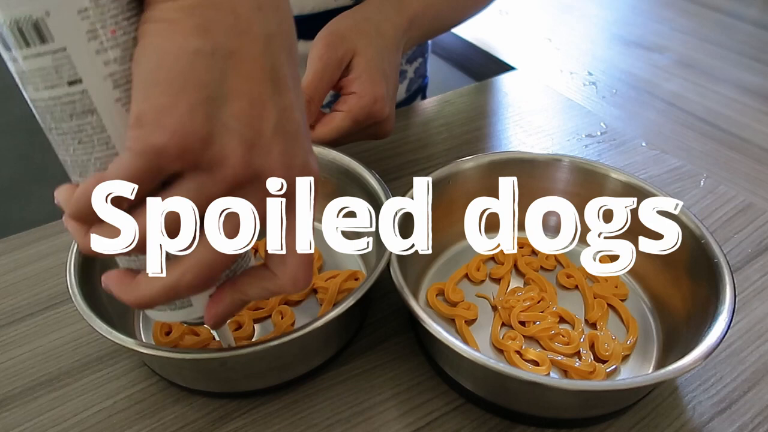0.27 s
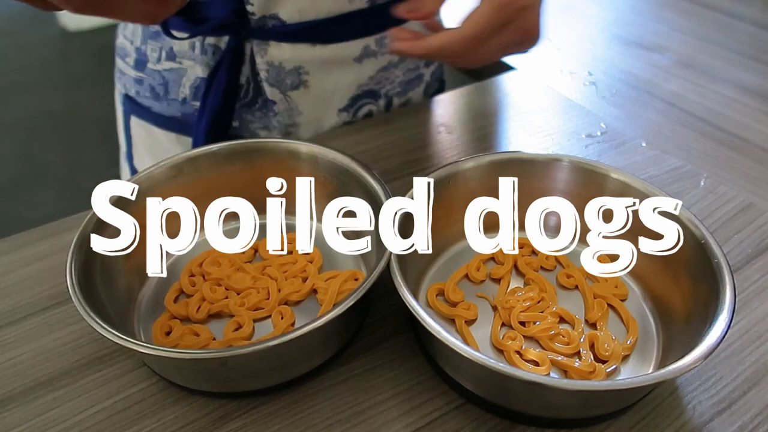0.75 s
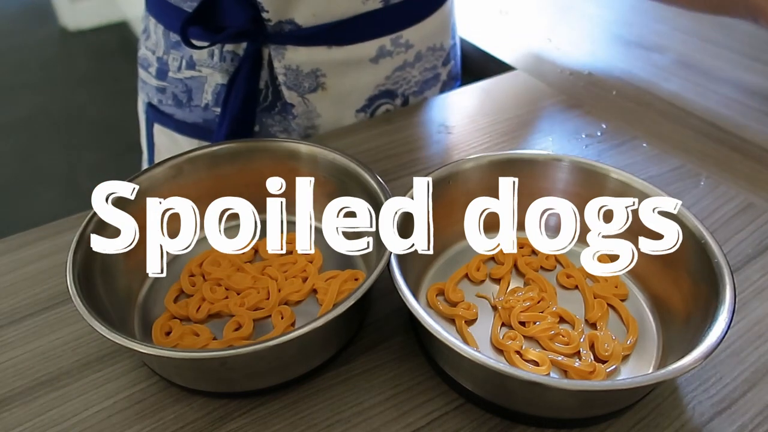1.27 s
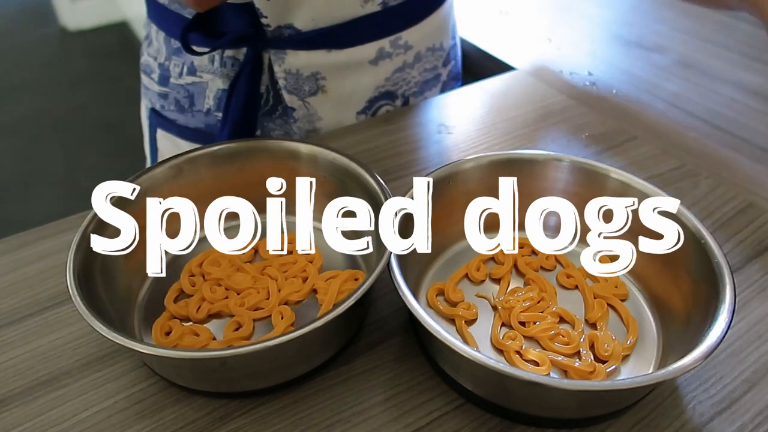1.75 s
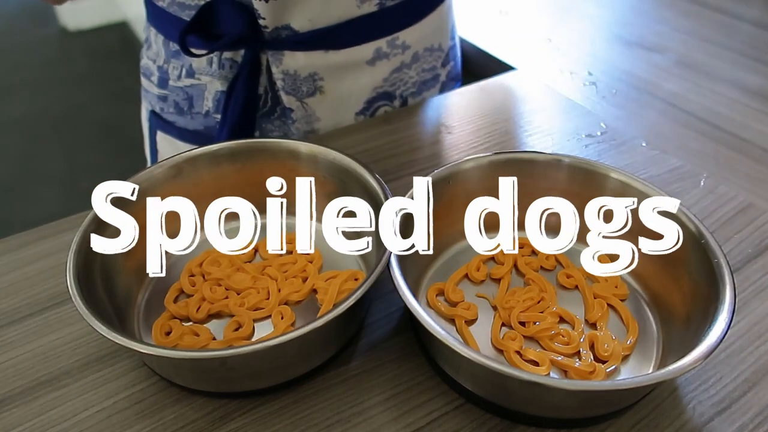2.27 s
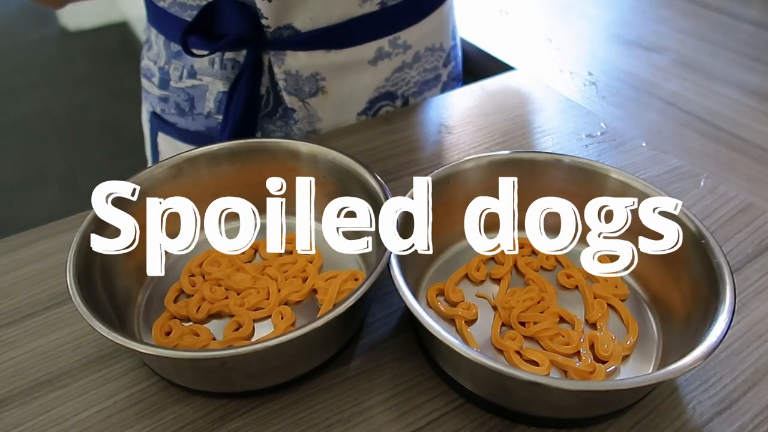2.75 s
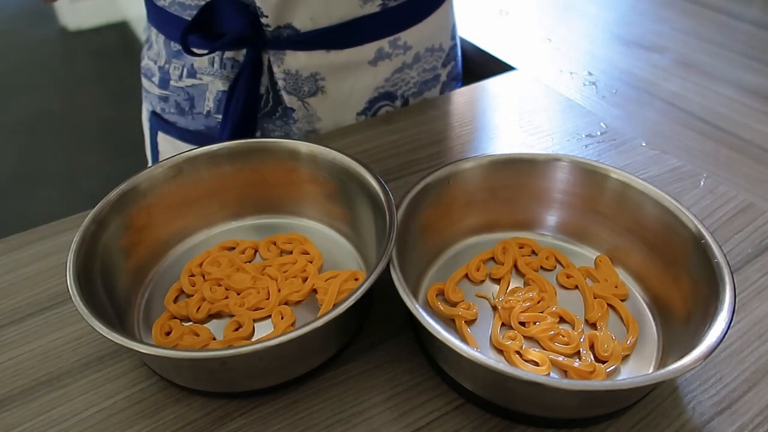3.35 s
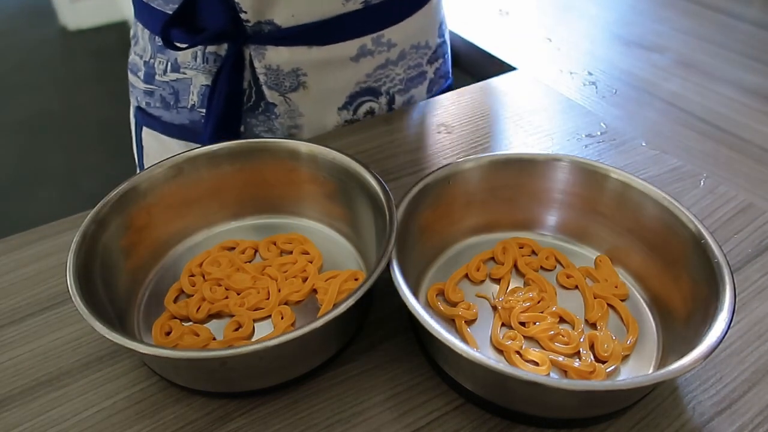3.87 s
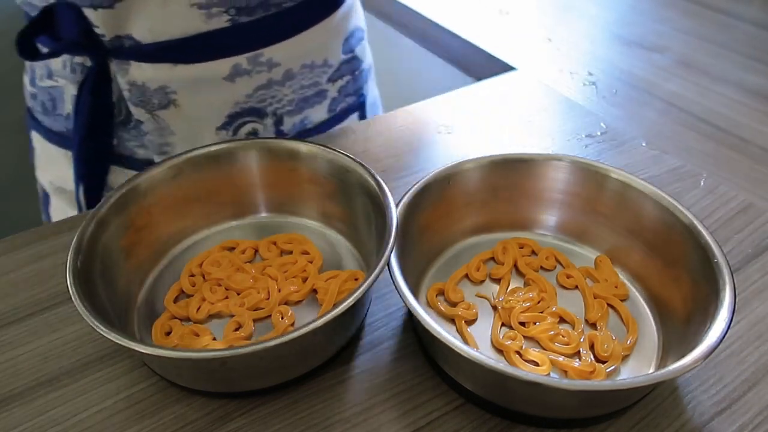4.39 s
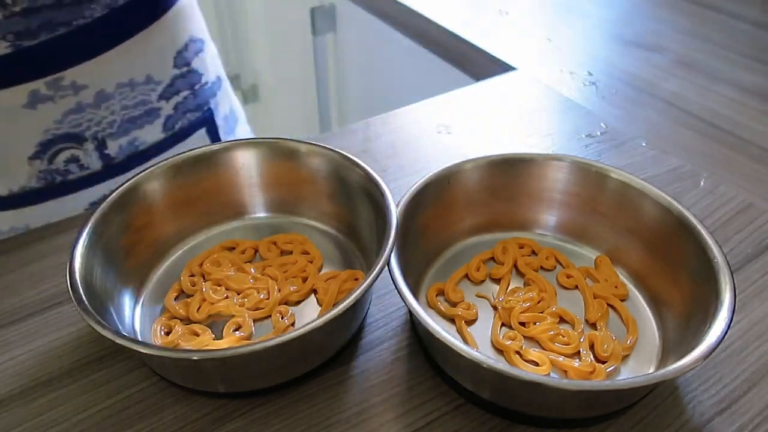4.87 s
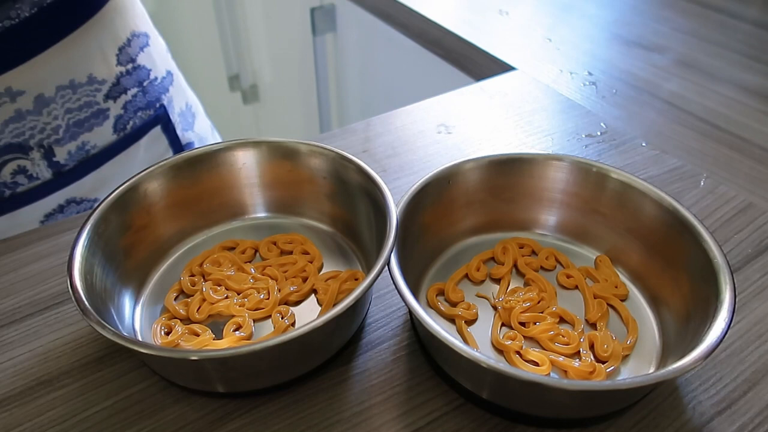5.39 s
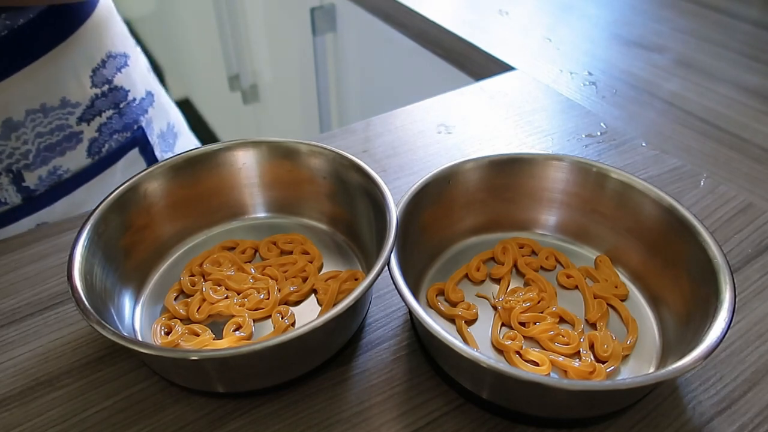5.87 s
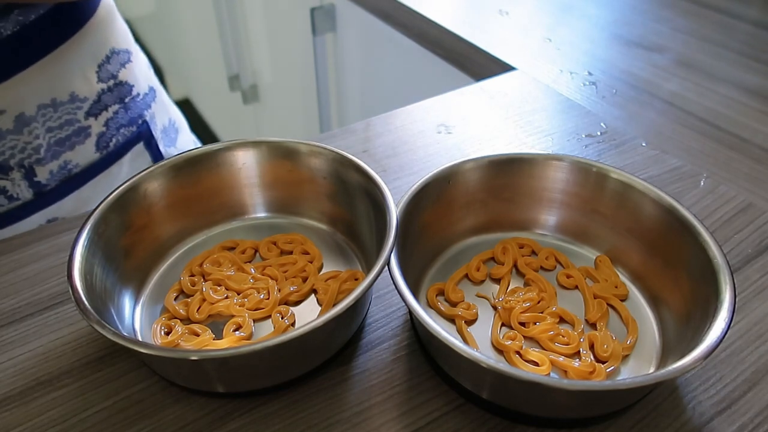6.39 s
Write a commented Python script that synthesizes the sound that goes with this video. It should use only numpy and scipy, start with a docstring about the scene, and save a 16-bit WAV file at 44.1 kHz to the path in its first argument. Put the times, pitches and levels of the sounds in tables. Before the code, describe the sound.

A small stereo microphone sits close to a kitchen counter, with low appliance rumble, mains hum and a faint, rapid focus-motor tick coming and going. A light knock at 0.06 s precedes a quick, short-ringing cluster of steel bowl taps around 0.3 s and a fainter touch at 0.55. Fingers slide softly from about 1 s; the tub knocks at 1.33-1.39 and is set down with a hard clack at 1.73. Its lid rattles at 2.77-2.9, twists with a sharp crack near 2.94 and a lighter click at 3.17, then snaps at 3.31 and very loudly at 3.36. The background dips briefly afterwards. Soft cloth rustles come around 3.9-4.4, tiny knocks at 4.96. A cupboard door bangs loudly at 5.32 with room echo; bowls buzz faintly at 5.42-5.6. Quiet woody knocks follow at 6.15-6.23 and 6.47.

```python
"""On a kitchen countertop, an emptied food tub is handled beside two steel bowls: a bowl is tapped, the tub is
set down, its lid rattles, twists and snaps shut; later a cupboard door bangs and the bowls buzz.
Struck things are short bursts of force sent through decaying tones, then a wash of room reflections.
Sliding fingers, soft noisy swells, room air, mains hum and a ticking focus motor lie below.
Everything reaches a small microphone pair whose gain ducks after the loudest blows."""
import sys
import numpy as np
from scipy import signal
from scipy.io import wavfile
from scipy.ndimage import minimum_filter1d, map_coordinates

SR = 44100
rng = np.random.default_rng(int(sys.argv[2]) if len(sys.argv) > 2 else 0)


def int16_out(signal):
    """Quantize to a 16-bit WAV file."""
    q = np.round(np.clip(np.atleast_2d(signal).T, -1, 1) * 32767)
    wavfile.write(sys.argv[1], SR, q.astype(np.int16))


N = 292345   # length in samples

# Room air and appliance rumble, tone colour. Columns: pitch_hz, level_db (per Hz, relative)
AIR_COLOUR = [(40, -25.5), (62, -4.5), (100, -5.5), (150, -0.5), (200, -7.5), (320, -9), (630, -12.5),
              (1000, -19), (2000, -22), (4000, -28), (8000, -37), (12500, -45.5), (15500, -64)]
# How wide the air sounds. Columns: pitch_hz, side_against_mid_db
AIR_WIDTH = [(60, -32), (150, -7), (380, -1.5), (950, -3.5), (2380, -2), (5980, -2), (15000, 4)]
# How long the room's reflections last. Columns: pitch_hz, time_to_fall_60_db_s
ROOM_FADES = [(100, 0.73), (400, 0.78), (1200, 0.73), (3000, 0.73), (6000, 0.62), (12000, 0.41)]
# How wide the reflections sound. Columns: pitch_hz, side_against_mid_db
ROOM_WIDTH = [(100, -42), (400, -27.5), (1300, -15.5), (2400, -17.5), (4400, -4), (7000, 3.5), (10000, 13)]
# When the focus motor runs. Columns: start_s, end_s
FOCUS_RUNS = [(0, 1.2), (2.42, 2.9), (3.7, 3.95), (4.196, 5.1), (5.776, 8.2)]
# Soft noisy swells: cloth-like rustles, and a wash around the door bang.
# Columns: peak_time_s, peak_db, fade_db_per_s
SOFT_SWELLS = [(3.93, -57, 140), (4.12, -49.5, 250), (4.38, -59.5, 53), (5.03, -63, 84), (5.281, -59, 100),
               (5.4, -47.5, 48), (5.56, -60.5, 126)]
# Tone colour of the soft swells. Columns: pitch_hz, level_db (per Hz, relative)
SWELL_COLOUR = [(500, -33.5), (1500, 2), (3000, 0.5), (5000, -9), (9000, -32.5), (15000, -58)]
# Fingers sliding on the tub. Columns: time_s, level_db
FINGER_SLIDE = [(.85, -90), (1.0, -62.5), (1.2, -65), (1.32, -56.5), (1.36, -67)]

# Touches that share one hardness. Columns: start_s, peak_db, contact_ms
# Taps on a bowl
TAPS = [(.285, -27.5, 8.8), (.297, -24, 10), (.308, -27, 36), (.555, -46, 22)]
# Bowls buzzing after the door
BUZZES = [(5.417, -34.5, 2.3), (5.44, -36.5, 96), (5.52, -33, 31), (5.56, -39.5, 48)]
# Bangs of the cupboard door
BANGS = [(5.316, -6, .1), (5.3185, -1.5, 0.081), (5.322, -9, 12), (5.334, -19, 44)]

# Touches of changing hardness. Columns: start_s, peak_db, contact_ms, brightness_db_per_octave
# Low thumps of the countertop
THUMPS = [(.064, -33, 0.12, .6), (.288, -31.5, 6.4, .6), (1.386, -37, 3.2, .6), (1.720, -29.5, 4, .6),
          (3.676, -36, 27, 19)]
# Small knocks: first the tub touching the counter, later ones on the cabinet
LIGHT_KNOCKS = [(.061, -29.5, 2.94, 1.5), (4.958, -37.5, 5, 10.5), (4.972, -34.5, 51, 8.5),
                (6.154, -40.5, 14, -7), (6.176, -36.5, 10, -4.5), (6.188, -31.5, 11, -11),
                (6.207, -29.5, 12, -7), (6.225, -41.5, 16.3, -10), (6.465, -36.5, 6.3, -4.5)]
# The tub knocking and being set down
KNOCKS = [(1.327, -26, 6.2, 9.5), (1.332, -27, 9.9, -8.5), (1.365, -24, 13.8, -6),
          (1.386, -22.5, 0.77, -11), (1.393, -32, 7.2, -9), (1.718, -26.5, 18, 6.5),
          (1.7275, -8.5, .1, 0.5), (1.734, -25.5, 11, -10)]
# The lid rattling loose
RATTLES = [(2.769, -22.5, 7.5, 4), (2.779, -20, 13, -1.5), (2.791, -24, 8, 7.5), (2.830, -12.5, .14, -2),
           (2.905, -24, 10, -3)]
# The lid being twisted
TWISTS = [(2.9215, -16, .13, 3.5), (2.925, -25, 8.4, 7), (2.936, -1.6, .03, 1), (3.173, -24.5, .12, -1.5)]
# The lid snapping shut
SNAPS = [(3.314, -15.5, 0.13, -3), (3.3618, 5, .1, 5)]

# The tones each thing rings with. Columns: pitch_hz, level_db, time_to_fall_60_db_s
# Housing around the focus motor
HOUSING_TONES = [(3300, -13, .008), (4090, 1, .014), (4340, 4.5, 0.013)]
# Countertop
COUNTER_TONES = [(130, -8.5, 0.27), (229.3, -16, 0.13), (363, -28, 0.036)]
# Wooden-sounding short tones shared by all the small knocks
LIGHT_KNOCK_TONES = [(291, -11.5, 0.026), (407, 4, 0.0046), (592, -1.5, 0.028), (910, 4.5, 0.0052),
                     (1470, 6, 0.0081), (2470, 6, 0.0027), (3900, -11.5, 0.0055), (4370, -12, 0.0061)]
# Cupboard door
DOOR_TONES = [(134.7, -5, 0.11), (171.6, -5, 0.08), (203.4, -7.5, 0.079), (249, -1.5, 0.046),
              (335, -7, 0.071), (366.6, -2.5, 0.037), (483, -6.5, 0.007), (547, -5.5, 0.012),
              (608, 1.5, 0.02), (722, -11.5, 0.014), (720, -6, 0.024), (964, -0.5, 0.02),
              (1015, -3.5, 0.033), (1414, -9.5, 0.013), (1840, -11.5, 0.0057), (2280, -14.5, 0.0043),
              (3060, -18.5, 0.021), (3810, -26, 0.0097), (5400, -31, 0.0049)]
# Steel bowl
BOWL_TONES = [(348, 5.5, 0.066), (626, -7, 0.05), (810, 4.5, 0.0068), (1095, 3.5, 0.073), (1390, -1, 0.014),
              (1640, -2, 0.057), (1893, -4.5, 0.037), (2050, -7, 0.042), (2354, -2, 0.026),
              (2590, -22.5, 0.84), (4460, -21, 0.027), (5630, -8, 0.0067), (6550, -13, 0.019),
              (7520, -9.5, 0.0057), (9160, -14, 0.017), (10560, -10.5, 0.0071)]
# Food tub
TUB_TONES = [(308, -19, 0.01), (600, -39, 0.018), (735, -3, 0.0038), (1124, 3.5, 0.0088), (1275, 2, 0.017),
             (1414, 1.5, 0.029), (1660, 5, 0.0035), (2170, -1.5, 0.0087), (2430, -8, 0.0083),
             (3100, -10, 0.0095), (3600, -19, 0.014), (4110, -13.5, 0.0088), (4700, -41, 0.008),
             (5800, -13, 0.0017)]
# Lid lying loose
LOOSE_LID_TONES = [(1380, -31, 0.0027), (1892, 5.5, 0.015), (2270, -2.5, 0.013), (2664, -12, 0.0141),
                   (3507, -5.5, 0.0045), (4145, -12.5, 0.013), (6710, -39, .004)]
# Lid under twist
TWISTED_LID_TONES = [(1100, -5.5, 0.0081), (1368, -0.5, 0.019), (2120, -7.5, 0.0072), (3220, -9, 0.0049),
                     (3806, -5.5, 0.01), (4250, -10, 0.0042), (6560, -23, 0.0026), (10990, -37, 0.0014)]
# Lid closed on the tub
SHUT_LID_TONES = [(853, -3.5, 0.012), (1100, 0.5, 0.0101), (1410, -3.5, 0.014), (1590, -5, 0.0066),
                  (1784, -8.5, .008), (2040, 2, 0.006), (2485, -3.5, 0.019), (2894, -5.5, 0.0086),
                  (3585, -3.5, 0.0036), (4870, -18, 0.0057), (6000, -15, 0.002216), (8570, -28.5, .003),
                  (10500, -42.5, 0.00309), (11690, -33, .002), (14000, -27, 0.00119)]

EDGES_HZ = 40 * 2 ** np.arange(0, 9.1, .5)   # half-octave band edges
AIR_DB, HUM_HZ, HUM_DB = -52, 49.6, -49.5
STEP_S, STEP_SHARE, STEP_DB = .01, .6, -57   # motor beat, share of steps that tick, middle tick strength
SWELL_RISE_DB_S = 193
ROOM_CUT_HZ = 11000   # gentle low-pass that keeps the reflections soft on top
LID_CUT_HZ = 230   # a lid is too small to radiate below this
SNAP_ECHO_MS, SNAP_ECHO_DB, SNAP_ECHO_HZ = 3.71, -3.5, 5100   # duller copy off a nearby surface
TAP_BRIGHT, BUZZ_BRIGHT, DOOR_BRIGHT = 1.45, 4.2, 0.089   # dB per octave
# Left channel against right, in dB
TAP_PAN_DB, BUZZ_PAN_DB, TUB_PAN_DB, LID_PAN_DB, DOOR_PAN_DB = -1.5, 3, -2.5, -0.8, 1.6
PORT_LAG_US_PER_DB = 14.5   # the nearer microphone port hears a blow both louder and earlier
CHATTER_FADE_DB = 4   # chatter lost from first touch to parting
FULL_CHATTER_MS = 1.1   # a contact this long chatters as strongly as it ticks
DUCK_FROM_DB, DUCK_HOLD_S, DUCK_RELEASE_DB_S, DUCK_ATTACK_S = 1, 0.11, 6.5, .004
CUTOFF_HZ = 15600


def from_db(db):
    """Turn decibels into gain."""
    return 10 ** (np.asarray(db) / 20)


def rms_one(x):
    """Scale a sound so its rms level is 1."""
    return x / np.sqrt(np.mean(x ** 2) + 1e-20)


def level(rows):
    """Gain over time from time and dB rows; practically silent outside them."""
    s, db = np.transpose(rows)
    return from_db(np.interp(np.arange(N) / SR, s, db, left=-200, right=-200))


def at_hz(points, hz):
    """Read a table between its rows, with pitch spaced by octaves."""
    table = np.array(points)
    return np.interp(np.log(hz), np.log(table[:, 0]), table[:, 1])


def drift(rate_hz):
    """Slow random wandering of spread 1: smoothed noise, made at every 40th sample."""
    r = np.exp(-80 * np.pi * rate_hz / SR)
    noise = rng.standard_normal(N // 40 + 2002)
    slow = signal.lfilter([1], [1, -2 * r, r * r], noise)[2000:]   # drop the start-up
    return np.interp(np.arange(N) / 40, np.arange(len(slow)), rms_one(slow))


def bands(size):
    """Half-octave bands of mid and side noise, each with its centre pitch."""
    white = rng.standard_normal((2, 2, size))   # neighbouring bands get unrelated noise
    tops = np.minimum(EDGES_HZ[1:], .45 * SR)
    for k, (low, high) in enumerate(zip(EDGES_HZ, tops)):
        band = signal.butter(2, [low, high], "band", fs=SR, output="sos")
        yield np.sqrt(low * high), signal.sosfilt(band, white[k % 2])


def left_right(pair, side_db):
    """Turn mid and side into left and right."""
    return pair[0] + from_db(side_db) * pair[1] * [[1], [-1]]


def ring(force, tones, bright=0.):
    """Send a force through decaying tones; more brightness tilts them toward the treble."""
    out = 0
    for k, (hz, level_db, t60) in enumerate(tones):
        r = from_db(-60 / (max(t60, 1e-3) * SR))
        w = 2 * np.pi * hz / SR
        gain = from_db(level_db + bright * np.log2(hz / 1500)) * (-1) ** k
        out = out + gain * signal.lfilter([0, np.sin(w)], [1, -2 * r * np.cos(w), r * r], force + 1e-18)
    return out


def air():
    """Room air and appliance rumble, each noise band wavering a little, over a steady mains hum."""
    together = .5 * drift(1.8)
    out = 0
    for hz, pair in bands(N):
        gain = from_db(at_hz(AIR_COLOUR, hz) + together + 1.06 * drift(8))
        out = out + gain * left_right(pair, at_hz(AIR_WIDTH, hz))
    phase = 2 * np.pi * np.cumsum(HUM_HZ + 0.36 * drift(2.5)) / SR
    hum = from_db(HUM_DB + .5 * drift(12)) * np.sqrt(2) * np.sin(phase)
    return from_db(AIR_DB) * out / np.std(out.mean(axis=0)) + hum


def focus_motor():
    """Some steps of a regular beat tick; the housing carries them to the two ports in opposite phase."""
    s = np.arange(0, N / SR - STEP_S, STEP_S)
    chance, size_db, jitter = rng.random(len(s)), rng.normal(0, 3.0, len(s)), rng.random(len(s))
    running = sum((s >= start) & (s < end) for start, end in FOCUS_RUNS)
    at = ((s + .3 * STEP_S * jitter) * SR).astype(int)
    steps = np.zeros(N)
    steps[at] = running * (chance < STEP_SHARE) * from_db(STEP_DB + size_db)
    return ring(steps, HOUSING_TONES) * [[1], [-1]]


def kitchen(x, size=SR):
    """Room reflections: a dense wash of noise in which each band dies at its own rate."""
    t = np.arange(size) / SR
    tail = 0
    for hz, pair in bands(size):
        fade = from_db(-60 * t / at_hz(ROOM_FADES, hz))
        tail = tail + fade * left_right(pair, at_hz(ROOM_WIDTH, hz))
    tail = tail * np.clip((t - .004) / 0.00076, 0, 1)   # the first walls answer after a few ms
    tail = signal.sosfilt(signal.butter(4, ROOM_CUT_HZ, fs=SR, output="sos"), tail)
    return signal.fftconvolve(x[None], tail / np.sqrt(np.sum(tail[0] ** 2)), axes=1)[:, :N]


def soft_swells():
    """Flickering bright noise, like cloth or a wash, that swells and fades at set rates around each peak."""
    together, t = drift(3.9), np.arange(N) / SR
    out = 0
    for hz, pair in bands(N):
        out = out + from_db(at_hz(SWELL_COLOUR, hz) + 3.0 * together) * left_right(pair, -8.0)
    gain = 0
    for s, peak_db, fade_db in SOFT_SWELLS:
        drop_db = np.where(t < s, SWELL_RISE_DB_S * (s - t), fade_db * (t - s))
        gain = gain + from_db(peak_db - drop_db)
    return gain * rms_one(out)


def blows(contacts, tones, pan_db=0., bright=0., size=SR // 2):
    """Each contact is a first tick and an uneven, fading chatter while the surfaces touch."""
    out, t = np.zeros((2, N + size)), np.arange(size) / SR
    chatter = rng.standard_normal((len(contacts), size))
    lag = pan_db * PORT_LAG_US_PER_DB * 1e-6 * SR   # in samples
    for (s, peak_db, ms, *own_bright), grains in zip(contacts, chatter):
        part = t * 1000 / max(ms, .01)   # 0 at first touch, 1 at parting
        touching = part < 1
        fade = from_db(-CHATTER_FADE_DB * np.minimum(part, 1))
        force = grains * touching * fade / np.sqrt(np.sum(touching))
        force = force * np.clip(ms / FULL_CHATTER_MS, 0, 2)   # long contacts are mostly chatter
        force[0] = 1   # the first tick
        sound = ring(force, tones, bright + sum(own_bright))
        # the farther port hears it slightly later
        pair = np.array([map_coordinates(sound, [t * SR - max(side * lag, 0)], order=3) for side in (-1, 1)])
        at = round(s * SR)
        gain = from_db(peak_db + pan_db * np.array([[.5], [-.5]]))
        out[:, at:at + size] += pair / np.abs(sound).max() * gain
    return out[:, :N]


def counter():
    """Thumps ring the countertop's few low tones."""
    return blows(THUMPS, COUNTER_TONES)


def light_knocks():
    """Small knocks on counter and cabinet ring one shared set of short tones."""
    return blows(LIGHT_KNOCKS, LIGHT_KNOCK_TONES)


def cupboard_door():
    """Bangs ring the door's many low and middle tones."""
    return blows(BANGS, DOOR_TONES, DOOR_PAN_DB, DOOR_BRIGHT)


def bowls():
    """Taps and later buzzes ring the same steel tones, the buzzes brighter and to the other side."""
    taps = blows(TAPS, BOWL_TONES, TAP_PAN_DB, TAP_BRIGHT)
    return taps + blows(BUZZES, BOWL_TONES, BUZZ_PAN_DB, BUZZ_BRIGHT)


def slide():
    """Dense small finger slips keep the tub's tones murmuring."""
    slips = rng.standard_normal(N) * (rng.random(N) < 900 / SR)   # about 900 slips a second
    return level(FINGER_SLIDE) * rms_one(ring(slips, TUB_TONES, bright=4.5))


def tub():
    """Knocks ring the tub's short tones, with the finger slide added."""
    return blows(KNOCKS, TUB_TONES, TUB_PAN_DB) + slide()


def lid(contacts, tones):
    """Blows on the lid, thin in the bass because it is small."""
    thin = signal.butter(2, LID_CUT_HZ, "high", fs=SR, output="sos")
    return signal.sosfilt(thin, blows(contacts, tones, LID_PAN_DB))


def near_echo(x):
    """A nearby surface returns one later, duller copy."""
    lag = round(SNAP_ECHO_MS * SR / 1000)
    dull = signal.sosfilt(signal.butter(1, SNAP_ECHO_HZ, fs=SR, output="sos"), x)
    return from_db(SNAP_ECHO_DB) * np.pad(dull, ((0, 0), (lag, 0)))[:, :N]


def scene():
    """Each thing is heard directly and again from the walls, with its own share of room."""
    snaps = lid(SNAPS, SHUT_LID_TONES)
    # pairs of sound and room_db
    things = [(counter(), -6), (light_knocks(), -1.5), (cupboard_door(), -1.5), (bowls(), -2.5), (tub(), 0.6),
              (lid(RATTLES, LOOSE_LID_TONES), -8), (lid(TWISTS, TWISTED_LID_TONES), -5), (snaps, -4)]
    direct = near_echo(snaps) + sum(sound for sound, room_db in things)
    to_walls = sum(from_db(room_db) * sound.mean(axis=0) for sound, room_db in things)
    # low cut on all the handled and struck sounds, as in a small microphone
    low_cut = signal.butter(4, 105, "high", fs=SR, output="sos")
    struck = signal.sosfilt(low_cut, direct + kitchen(to_walls))
    return air() + focus_motor() + soft_swells() + struck


def record(dry):
    """Gain ducks after peaks, holds, then creeps back; what it misses is clipped; the top is cut."""
    peak_db = 20 * np.log10(np.abs(dry).max(axis=0) + 1e-9)
    over_db = np.maximum(peak_db - DUCK_FROM_DB, 0)
    hold = int(DUCK_HOLD_S * SR) // 2 * 2 + 1   # an odd number of samples
    held = -minimum_filter1d(-over_db, hold, origin=hold // 2, mode="constant")   # largest recent excess
    creep = DUCK_RELEASE_DB_S * np.arange(N) / SR
    duck_db = np.maximum.accumulate(held + creep) - creep
    r = np.exp(-1 / (DUCK_ATTACK_S * SR))
    ducked = dry * from_db(-signal.lfilter([1 - r], [1, -r], duck_db))
    top_cut = signal.cheby2(12, 60, CUTOFF_HZ, fs=SR, output="sos")
    return signal.sosfilt(top_cut, np.clip(ducked, -1, 1))


dry = scene()
out = record(dry)
int16_out(out)
```